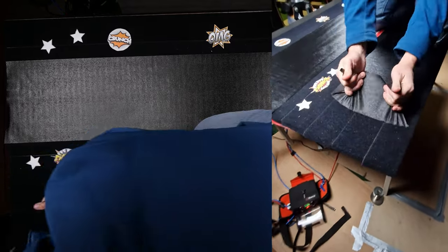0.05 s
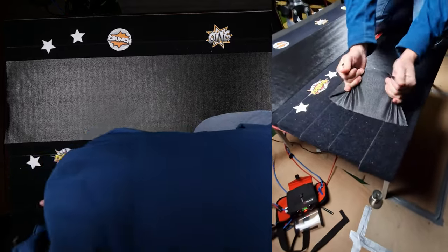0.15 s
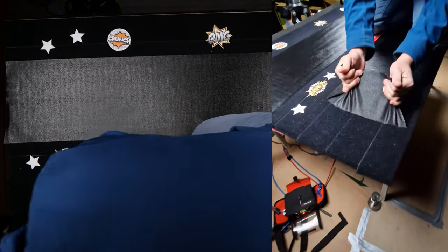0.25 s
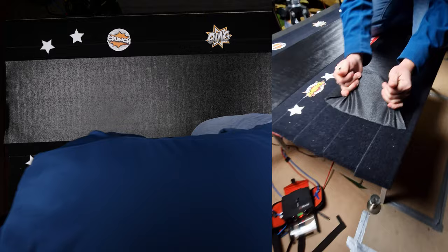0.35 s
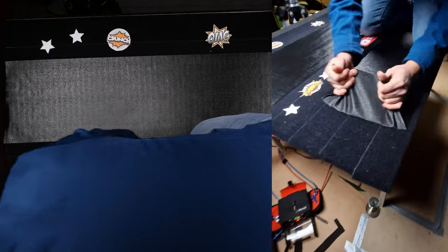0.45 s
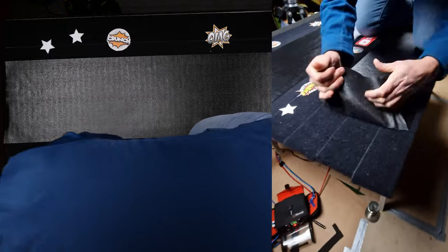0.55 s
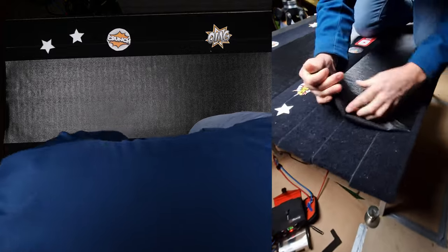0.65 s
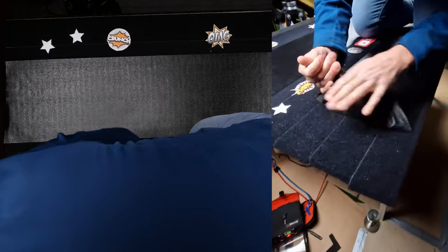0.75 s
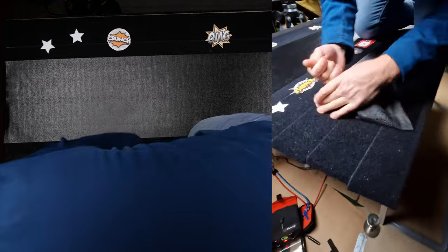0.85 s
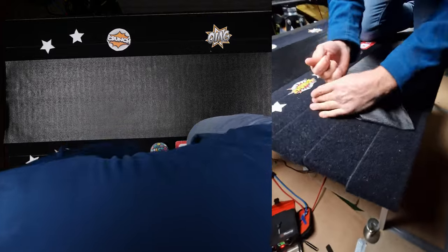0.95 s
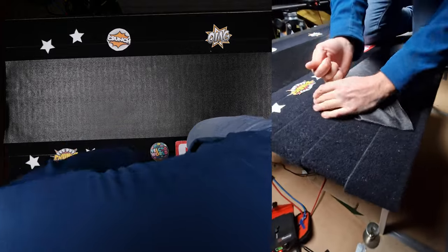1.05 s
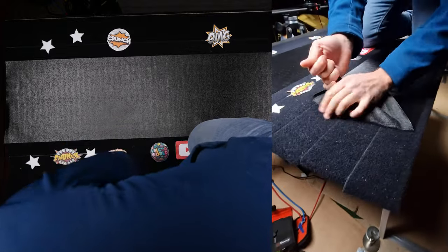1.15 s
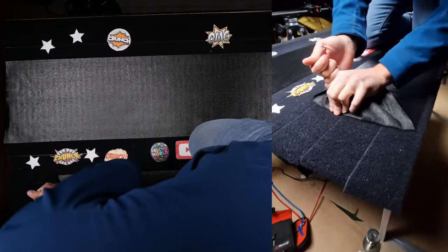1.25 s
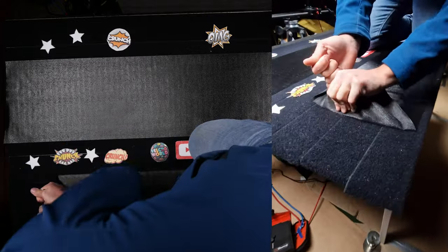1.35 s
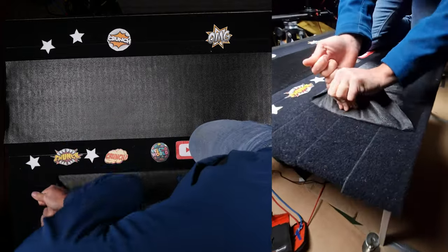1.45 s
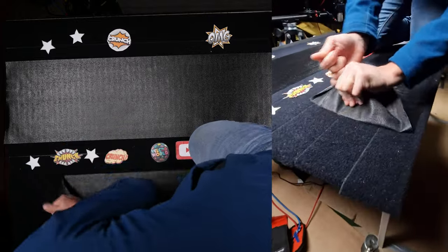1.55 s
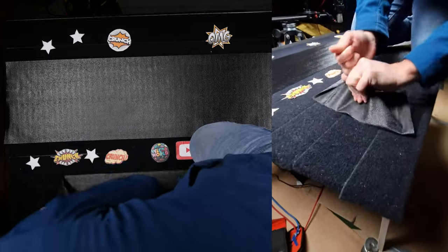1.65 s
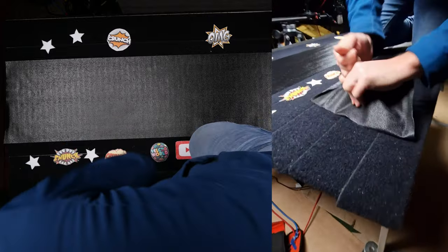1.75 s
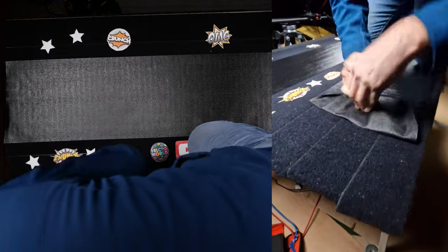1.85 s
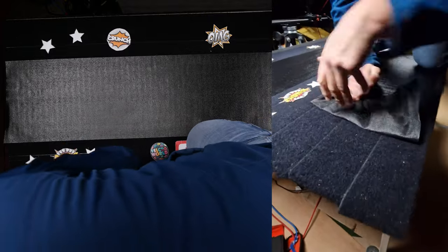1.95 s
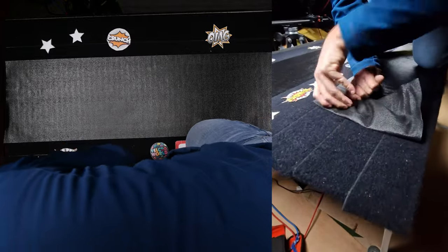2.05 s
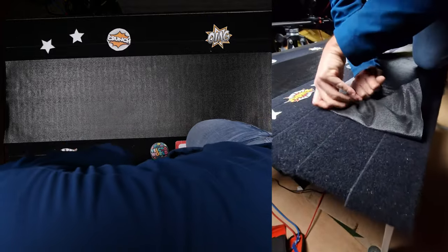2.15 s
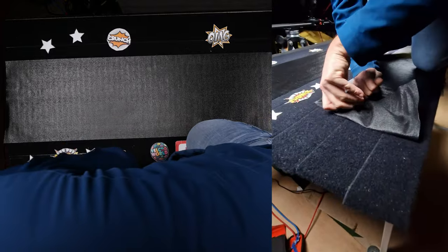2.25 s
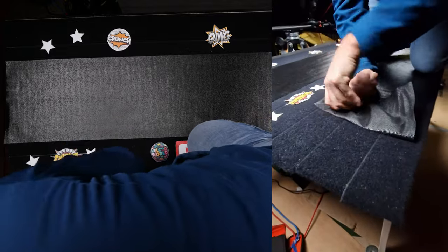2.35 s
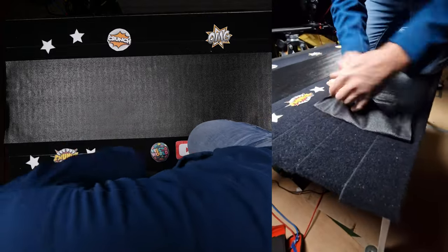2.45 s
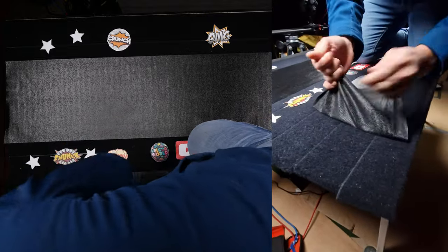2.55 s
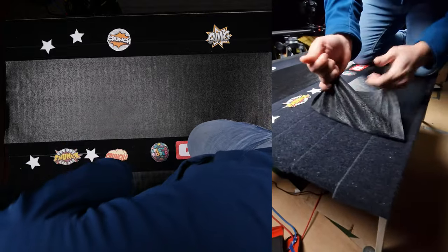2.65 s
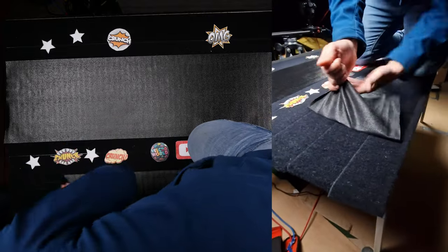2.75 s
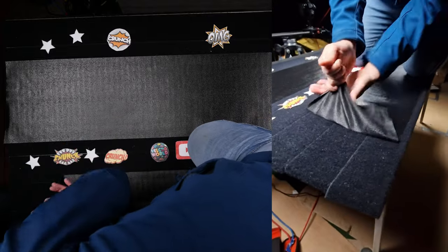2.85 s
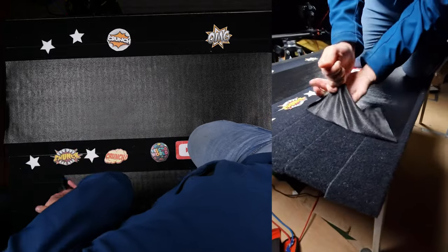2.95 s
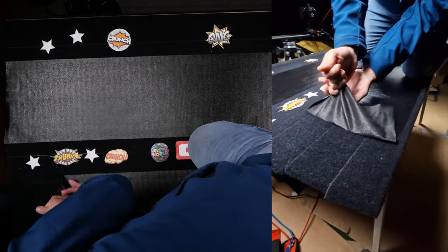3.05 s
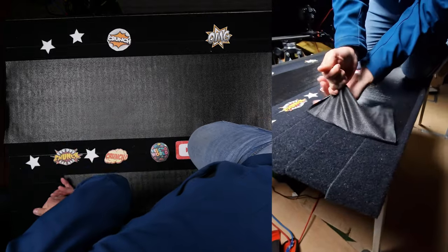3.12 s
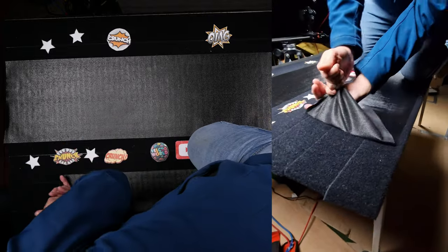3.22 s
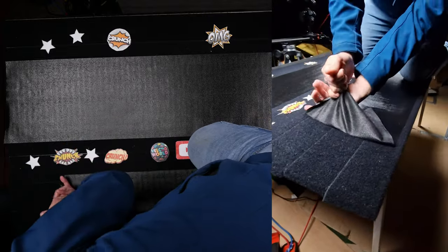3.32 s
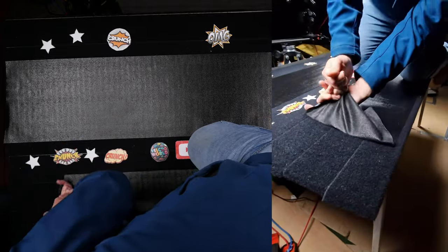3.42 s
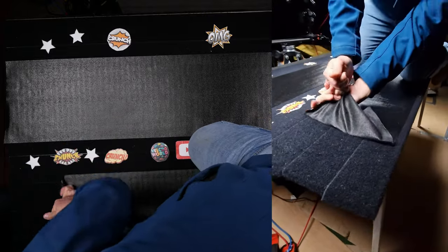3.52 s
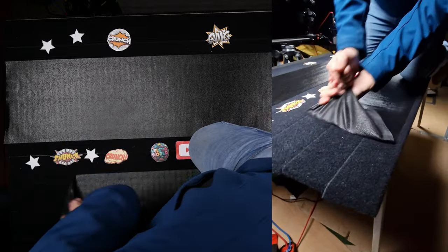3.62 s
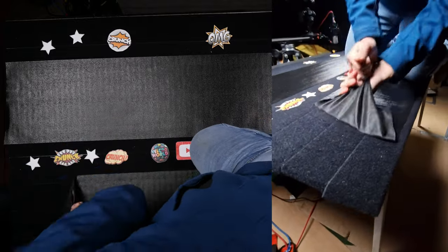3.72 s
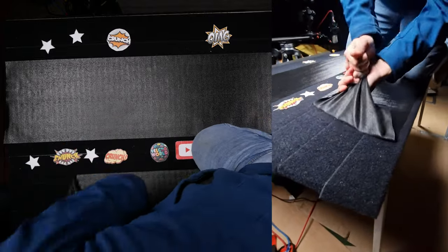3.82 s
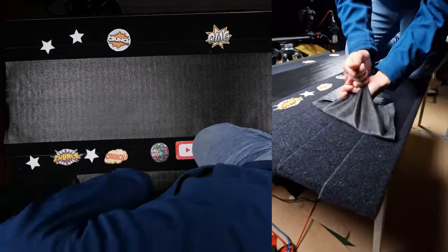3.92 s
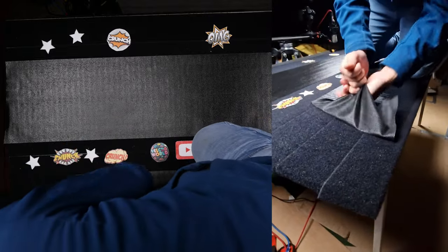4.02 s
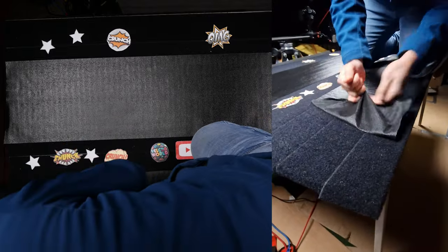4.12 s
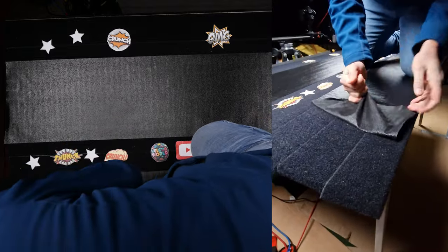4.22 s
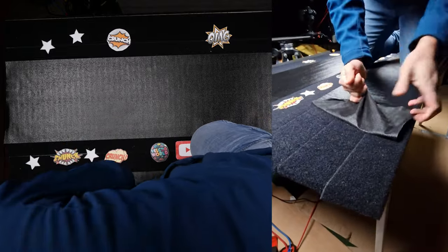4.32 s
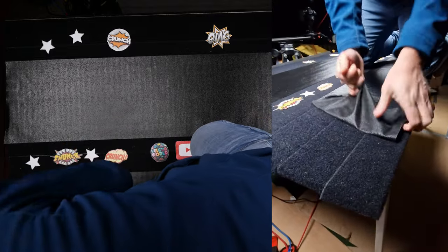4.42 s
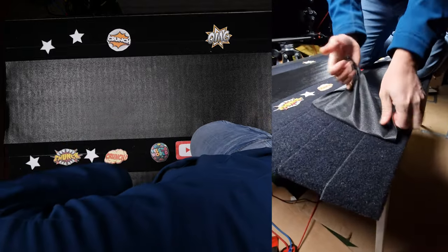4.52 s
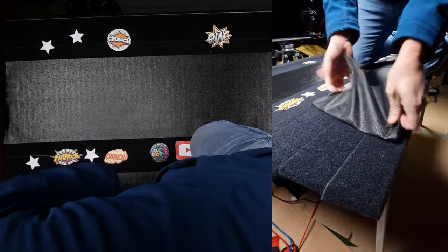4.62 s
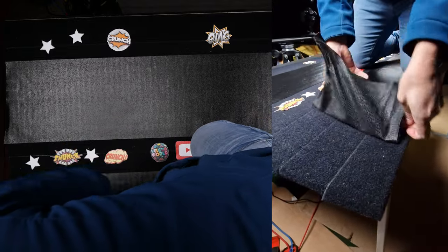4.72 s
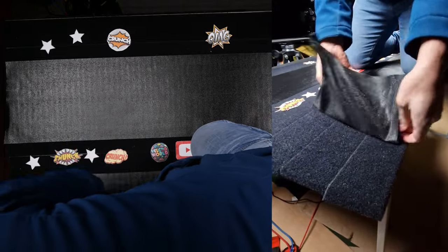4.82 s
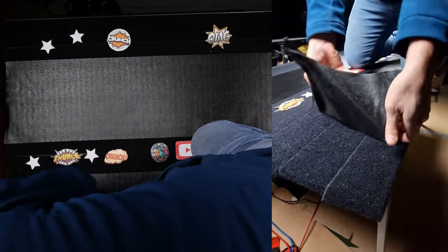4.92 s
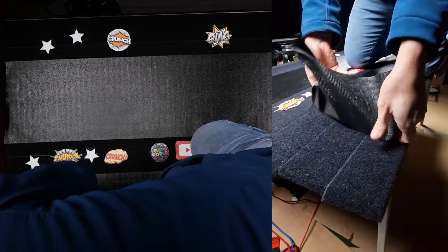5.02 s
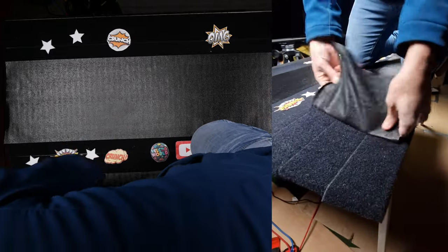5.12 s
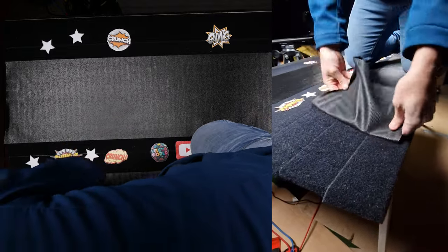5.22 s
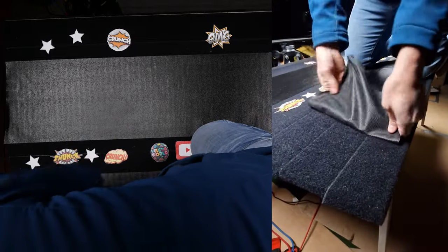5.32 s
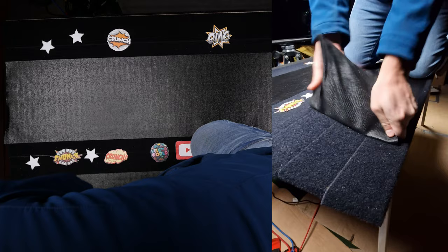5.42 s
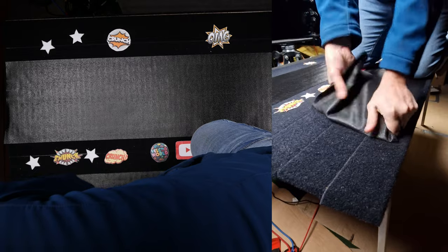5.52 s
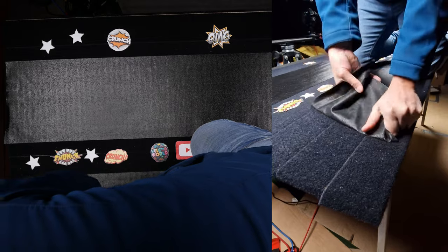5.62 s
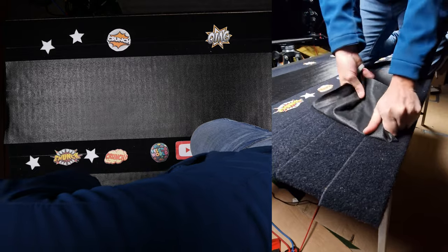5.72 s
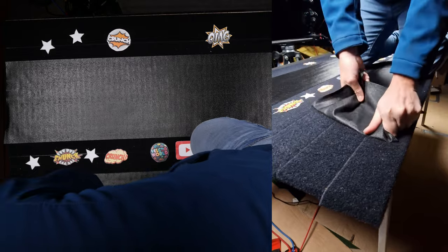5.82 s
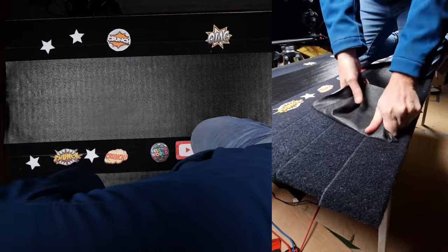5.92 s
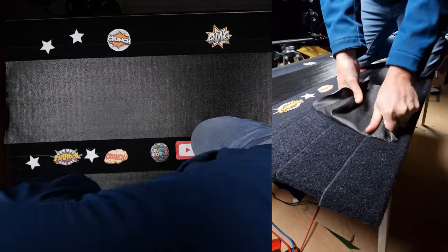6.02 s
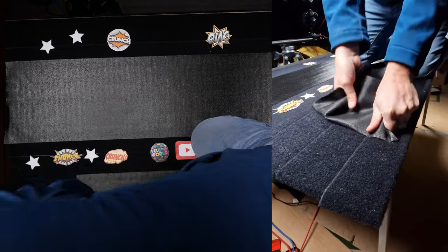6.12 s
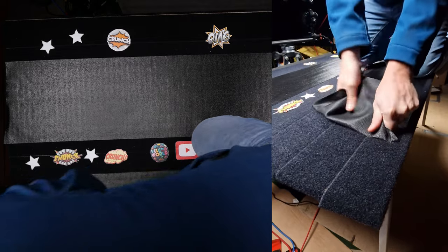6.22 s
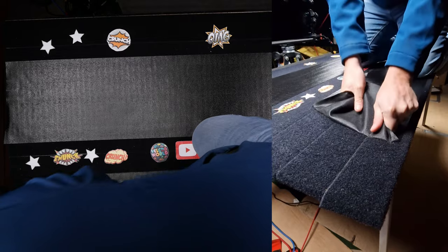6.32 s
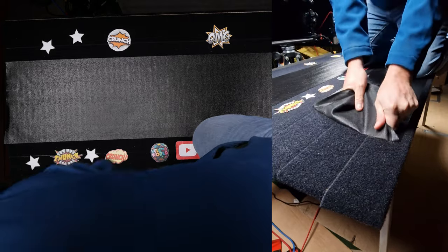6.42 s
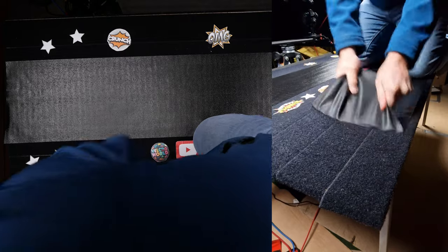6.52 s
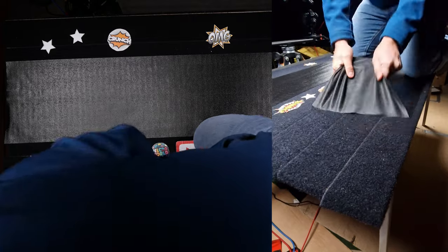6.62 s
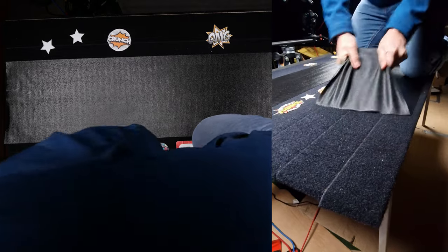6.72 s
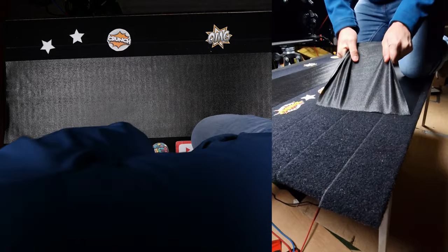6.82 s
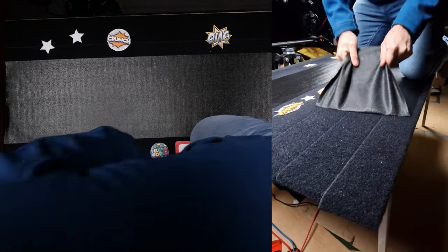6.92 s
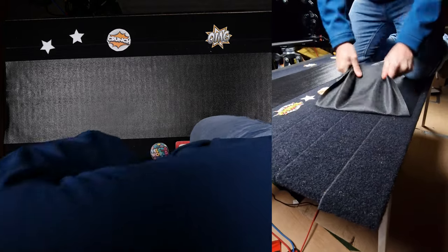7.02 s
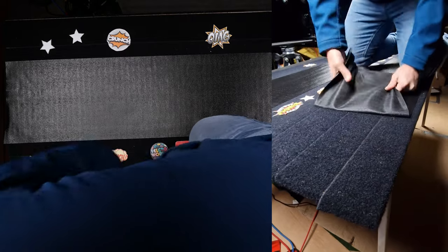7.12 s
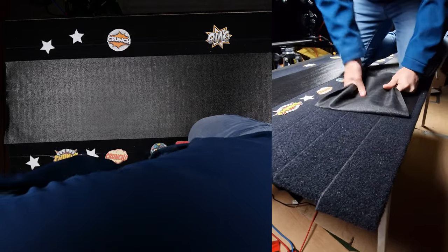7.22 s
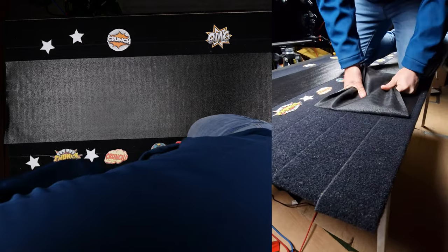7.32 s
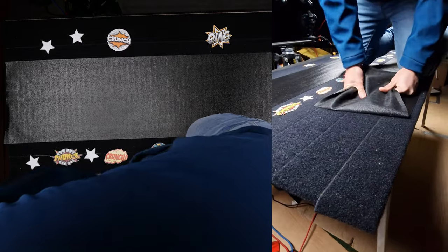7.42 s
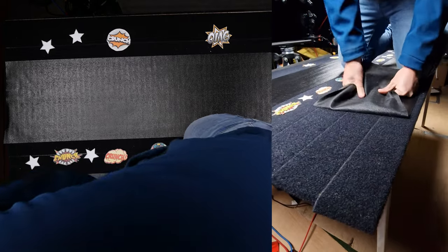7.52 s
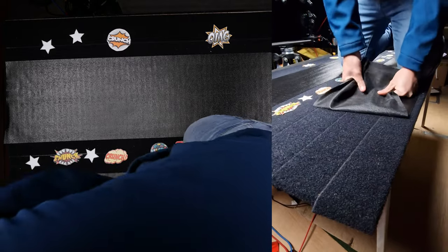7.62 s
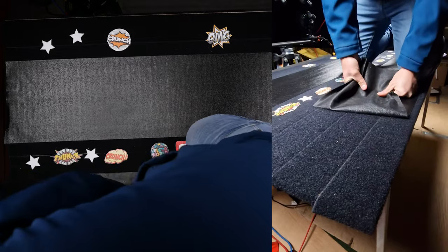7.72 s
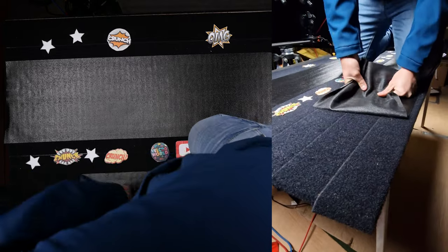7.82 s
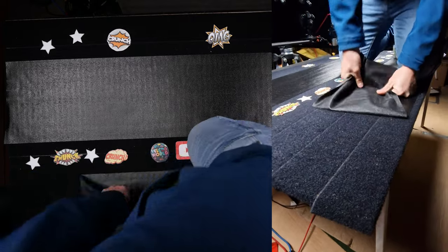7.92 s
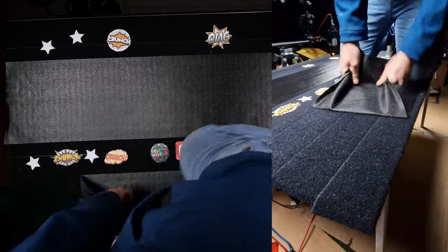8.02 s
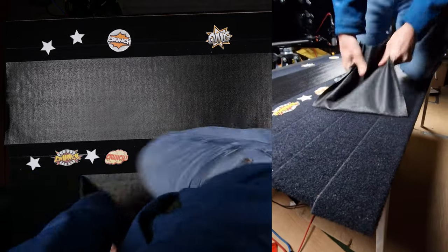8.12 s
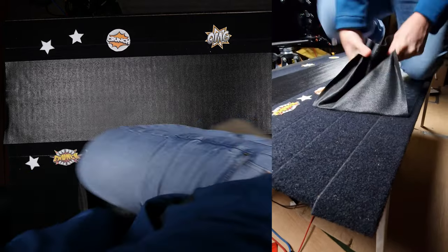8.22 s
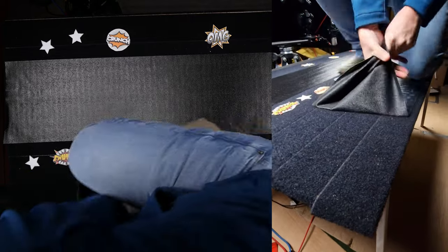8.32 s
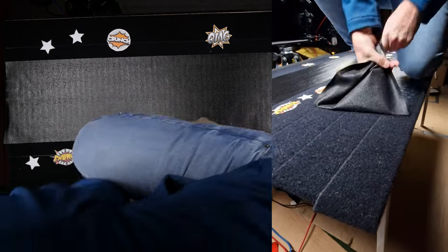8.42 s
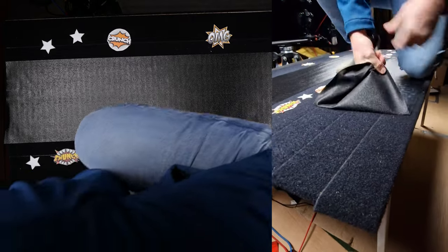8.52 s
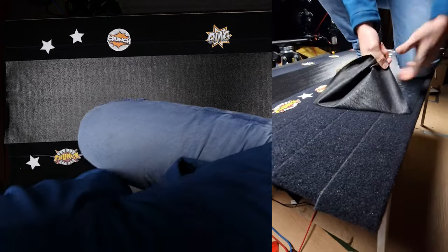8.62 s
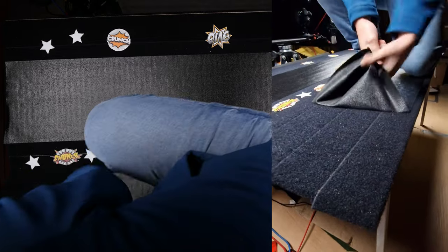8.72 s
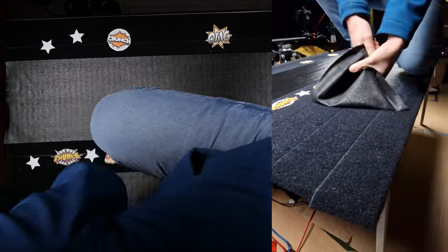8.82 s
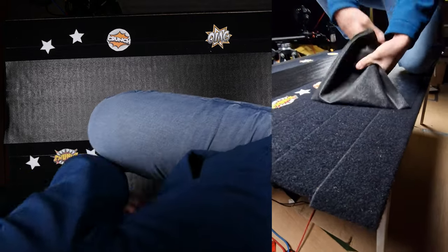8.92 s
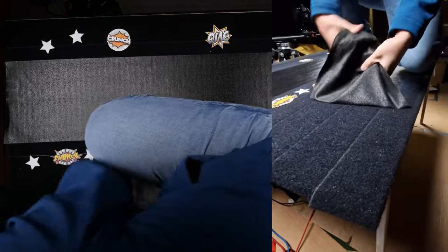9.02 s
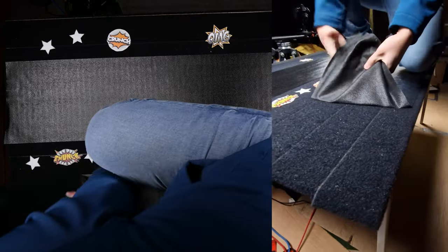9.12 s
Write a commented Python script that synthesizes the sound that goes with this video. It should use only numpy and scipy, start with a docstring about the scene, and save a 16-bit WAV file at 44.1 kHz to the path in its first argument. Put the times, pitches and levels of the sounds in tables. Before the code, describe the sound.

Close, dry rips of hook-and-loop fastener peeling from a board, separated by sparse crackles and hands shifting the cloth.

```python
"""Ripping hook-and-loop cloth off a board

The cloth is pulled off a padded board in a small workshop, close to two spaced microphones.
Every hook that lets go is a click: sparse crackle while hands shift the cloth, a dense rip when it tears
free. The board booms under the pull, fingers knock and rub on it, and moving cloth pushes the air."""
import sys
import numpy as np
from scipy import signal
from scipy.fft import rfft, irfft
from scipy.io import wavfile

SR = 44100
rng = np.random.default_rng(int(sys.argv[2]) if len(sys.argv) > 2 else 0)


def wrap_up_sound(samples):
    """Save the sound to the file named by the first command line argument, as 16-bit audio."""
    columns = np.atleast_2d(samples).T
    # keep every value between -1 and 1, then stretch to whole-number steps
    tamed = np.clip(columns, -1, 1)
    steps = np.round(tamed * 32767).astype(np.int16)
    wavfile.write(sys.argv[1], SR, steps)


N = 403956

# The tone of the quiet workshop: (frequency [Hz], relative level [dB])
HUSH_TONE = [(24, -23), (40, 11), (96, -27), (150, -2), (407, -28), (722, -7), (1520, 4), (2710, 0),
             (15500, -17)]
# How much later the right microphone hears the action: (time [s], delay [samples])
RIGHT_DELAY = [(0, 15.64), (3.8, 15), (4.5, 14.1), (6.6, 13.94), (7.5, 11.7), (9.16, 13.6)]
# Cloth flapped or slapped down, pushing air: (middle [s], length [s], level [dB])
CLOTH_FLAPS = [(.25, .1, -37), (.86, 0.42, -52), (1.91, 0.14, -42), (3.8, 0.078, -30), (3.91, .08, -41),
               (5.49, 0.16, -49), (6.855, 0.051, -41), (7.25, 0.29, -42), (7.63, 0.14, -40),
               (7.89, .08, -26.5), (8.24, 0.31, -33.5), (8.45, 0.12, -29), (8.76, 0.2, -47),
               (9.04, 0.13, -39)]
# Hands rubbing over the cloth: (middle [s], half length [s], pitch [Hz], level [dB])
HAND_RUBS = [(.55, 0.071, 875, -44), (0.717, 0.047, 3700, -37), (0.869, 0.064, 805, -39.5),
             (1.141, 0.047, 1190, -43), (2.971, 0.098, 1040, -50), (3.962, 0.01, 2630, -36),
             (4.113, 0.095, 3300, -43.5), (4.9, 0.013, 2660, -41), (8.199, 0.053, 890, -49),
             (8.296, 0.05, 1750, -27), (8.898, 0.037, 3470, -29.5)]
# Fingers and knuckles on the board: (time [s], strength [dB], extra bass [dB])
FINGER_KNOCKS = [(0.013, -16, -61), (0.053, -19.5, -39), (0.626, -27.5, -8), (0.654, -19.5, -28),
                 (0.82, -27.5, 14), (1.208, -31, -29), (1.291, -25.5, -22), (1.487, -22.5, 0),
                 (1.849, -34.5, -46), (1.89, -43, -25), (2.509, -15.5, 12.5), (2.841, -27, -23),
                 (4.993, -36, -16), (5.136, -26.5, -16), (5.305, -37, -21), (5.376, -34, -3),
                 (5.397, -33.5, -1), (5.438, -31, -1.5), (5.454, -17.5, -5), (5.585, -24, 6),
                 (5.986, -21.5, -17), (6.234, -15.5, -40), (6.438, -14, -21), (7.211, -23, -9),
                 (7.541, -32, -17), (7.641, -24, 5), (3.786, -31.5, 5), (7.854, -10.5, 10),
                 (7.995, -30.5, 13), (8.108, -29, -16), (8.38, -27, -19), (8.406, -22, -14)]
# The notes of the knocked board: (frequency [Hz], relative level [dB], time to fade by 60 dB [s])
BOARD_NOTES = [(89.7, -32, 0.017), (143.4, -23, 0.26), (219, 6.5, 0.0065), (592, 9.5, 0.0068),
               (828, 9, 0.0064), (1160, 1, 0.0064), (1820, -1.5, 0.0086)]
# Ringing of the board and the space under the cloth: (frequency [Hz], width [Hz], gain [dB])
RESONANCES = [(143.8, 6, 3.5), (224, 130, -19), (769, 76, -5), (1280, 72, 0), (2960, 610, -20)]
# A click has three parts: the hook, the body (taut cloth and padding) and the board.
# The tone of each: (frequency [Hz], relative level [dB])
HOOK_TONE = [(900, -11.5), (1400, 2.5), (2200, 2), (3200, 0.5), (4500, 2), (6500, -1.5), (10000, -2.5),
             (15000, -11.5)]
BODY_TONE = [(250, -21.5), (400, -3.5), (600, 2), (900, 1), (1300, -6), (2000, -5), (3000, -17.5)]
BOARD_TONE = [(60, 4), (100, 0.5), (150, 1), (230, 5), (340, -7.5), (500, -16)]
# How bright the pull sounds: (time [s], relative treble [dB])
PULL_TREBLE = [(0, -5), (.6, -5.5), (1.1, -5.5), (1.6, -4.5), (2, -9.5), (2.7, -6.5), (3.3, -7.5),
               (3.7, -3), (4.2, -7), (4.8, -6), (5.3, -6.5), (5.8, -7), (6.6, -4.5), (7.2, -8), (7.7, -8),
               (8.3, -6.5), (9.16, -7.5)]
# Hands shift, press and slowly peel the cloth:
# (middle [s], length [s], level [dB], relative body [dB], relative board [dB])
CLOTH_RUSTLES = [(0.027, 0.054, -42.5, 1, 18), (0.086, 0.092, -32, -4.5, -35),
                 (0.22, 0.026, -42.5, -6.5, -15), (.42, 0.11, -51.5, -58, -43), (0.483, 0.26, -48, -3, 0),
                 (.72, 0.081, -41, 1.5, -1.5), (0.861, 0.089, -50, 6, 4.5), (1.037, 0.09, -62.5, 2, -2),
                 (1.134, 0.096, -52.5, 5.5, 0), (1.31, 0.039, -54, 5, -17), (1.467, 0.36, -54, -1, -10),
                 (1.844, 0.084, -44, -1, -2.5), (1.984, 0.095, -48, -18, -12),
                 (2.215, 0.087, -46, -9.5, -51), (2.39, 0.15, -50, -6.5, -4.5), (2.517, 0.16, -56.5, 3, 3),
                 (2.824, 0.11, -53, -6, -10), (2.977, 0.16, -57, 3.5, -2.5),
                 (3.216, 0.14, -51.5, -3.5, -4.5), (3.367, 0.022, -60, -18, -39),
                 (3.868, 0.36, -57.5, -2, 7), (4.003, 0.17, -51.5, -11, -22),
                 (4.129, 0.11, -39, -10.5, -16), (4.258, 0.18, -58, -20, -39),
                 (4.515, 0.1, -39.5, -17, -16.5), (4.664, 0.14, -47, -9.5, -4.5),
                 (4.882, 0.058, -51.5, -0.5, -9), (5.098, 0.068, -56, 1, -7), (5.18, 0.062, -51, -0.5, -8),
                 (5.339, 0.038, -53, -4, -3), (5.491, 0.13, -51, 7, 7), (5.613, 0.11, -52, -6, -9),
                 (5.716, 0.063, -51, -2, -12), (5.883, 0.074, -52, -2, -2),
                 (5.975, 0.085, -34.5, -9.5, -20.5), (6.14, 0.21, -45.5, -3, -8),
                 (6.271, 0.061, -38, -6, -27), (6.382, 0.077, -40, -9, -36), (6.8, 0.18, -38, -13, -12),
                 (7.03, 0.14, -35, -16, -27), (7.18, 0.48, -48.5, -3.5, -2.5), (7.56, .16, -42, -8.5, -20),
                 (7.637, 0.12, -44, -4.5, 1), (7.862, 0.056, -52, 8, 38), (7.98, 0.16, -45.5, -16, -19),
                 (8.134, 0.48, -42.5, -7, -5), (8.297, 0.083, -41.5, 0, -0.5), (8.48, 0.38, -42, -5, -11.5),
                 (8.758, 0.12, -33, -12, -13), (8.9, 0.12, -34.5, -10, -5),
                 (9.064, 0.11, -35.5, -8.5, -9.5)]
# Hard tears: (start [s], length [s], level [dB], drop during the tear [dB], relative body [dB],
# relative board [dB], rise of the creep that leads up to it [dB/s])
HARD_TEARS = [(0.108, 0.038, -16.5, 3, -1, -2.5, 446), (1.54, 0.077, -22, -1.5, 0.5, -8, 392.5),
              (3.625, 0.072, -14.5, 2.5, -6.5, -8.5, 750.5), (6.441, 0.301, -15.5, 1.5, -1.5, -6, 446)]
# The loudest bunches of hooks that snap together: (time [s], strength [dB], relative treble [dB])
HOOK_SNAPS = [(0.0274, -24, -13.5), (0.0538, -29, -5), (0.4033, -31.5, -0.5), (0.4504, -26, -7.5),
              (0.4654, -21, -8), (0.51, -22.5, 1), (0.5515, -24.5, -1), (0.6549, -13.5, -11),
              (0.6932, -16, -5), (1.0332, -30, -9), (1.13, -26.5, -7), (1.2076, -16.5, -6.5),
              (1.291, -19, -9), (1.3354, -32, -2.5), (1.4173, -25.5, -5), (1.45, -20.5, -5.5),
              (1.4797, -20.5, -6), (1.4942, -17.5, -8), (1.5509, -4.5, -6.5), (1.5688, -9.5, -2.5),
              (1.6124, -15.5, -8), (1.7461, -20.5, -11.5), (1.8134, -24, -10), (1.8292, -14.5, -6),
              (1.8901, -8.5, -35), (1.95, -26.5, -3), (1.9792, -32, -14), (2.0944, -28, -16.5),
              (2.169, -20.5, -21.5), (2.2335, -14.5, -11), (2.3937, -25.5, -8), (2.439, -24, -6),
              (2.491, -27.5, -6), (2.8217, -22, -13.5), (2.8672, -24.5, -22.5), (3.3621, -27, -19.5),
              (3.478, -32.5, -12), (3.5696, -42, -4), (3.5858, -21.5, 2.5), (3.6126, -12, -4.5),
              (3.6292, -7, -11), (3.7863, -24.5, -16), (3.8741, -22.5, -11), (3.897, -23.5, -8.5),
              (3.955, -21, -6.5), (3.9745, -22.5, -8.5), (3.994, -17, -8.5), (4.249, -27.5, 1),
              (4.2682, -29.5, -1.5), (4.3031, -27, -6.5), (4.3842, -23.5, -12.5), (4.4357, -20, -2.5),
              (4.5142, -20, -3), (4.558, -24, -4), (4.586, -23.5, -1), (4.6528, -19.5, -1.5),
              (4.6725, -21, -5.5), (4.7054, -19.5, -5), (4.7336, -18.5, -8), (4.8249, -29.5, -8.5),
              (4.9928, -25.5, -14.5), (5.1361, -15, -7.5), (5.1537, -30, -3.5), (5.1856, -32, 0.5),
              (5.3124, -29.5, -10), (5.463, -17.5, -11.5), (5.4989, -14.5, -10), (5.5462, -24.5, -5),
              (5.552, -22, -2.5), (5.6134, -19.5, -8), (5.6343, -26, -3.5), (5.7163, -29, -0.5),
              (5.7288, -24.5, -8), (5.887, -14.5, -18), (5.9234, -18, -16), (5.9313, -19, -12),
              (5.9522, -13, -17.5), (5.9863, -12.5, -6), (6.0195, -24, -6), (6.126, -19, -6.5),
              (6.2575, -22, -3), (6.3533, -36, 0), (6.3977, -14.5, -10.5), (6.4378, -1, -13.5),
              (6.817, -14.5, -3.5), (6.8754, -40, -0.5), (7.002, -19.5, 1), (7.0269, -18.5, -3),
              (7.0846, -12, -7.5), (7.2843, -26, -9), (7.3155, -15, -13.5), (7.4719, -19.5, -25.5),
              (7.5002, -15.5, -10.5), (7.5423, -20, -20), (7.5978, -15, -9.5), (7.6395, -17.5, -11.5),
              (7.668, -14.5, -13.5), (7.7747, -22.5, -15.5), (7.8027, -12.5, -14), (7.8977, -6.5, -17),
              (7.9336, -14.5, -11), (8.025, -25.5, -6), (8.1092, -22, 2), (8.1484, -13.5, -17.5),
              (8.381, -20, -28), (8.4014, -11.5, -7.5), (8.4962, -12, -9.5), (8.5406, -12.5, -18.5),
              (8.609, -14.5, -5), (8.6475, -17.5, -4.5), (8.6976, -9, -4), (8.7524, -16, -3),
              (8.7853, -26, 1), (8.8379, -13, -8), (8.854, -14, -7.5), (8.9089, -3.5, -12),
              (8.976, -13.5, -12.5), (9.0299, -19, -16), (9.0508, -11, -18.5), (9.1012, -14, -5)]


def from_db(db):
    """Turn decibels into a number to multiply by."""
    return 10 ** (np.asarray(db) / 20)


def rms_one(x):
    """Scale a signal so that its average power is 1."""
    return x / np.sqrt(np.mean(x ** 2) + 1e-20)


def in_time(points):
    """Join (time, value) points with straight lines, giving one value per sample."""
    return np.interp(np.arange(N) / SR, *np.transpose(points))


def at_hz(points, hz):
    """Look up the level of a tone table at a frequency, moving evenly in octaves."""
    frequencies, levels = np.transpose(points)
    return np.interp(np.log(hz), np.log(frequencies), levels)


def filtered(x, order, hz, kind):
    """Keep the "low", "high" or "band" part of a sound; a higher order cuts more steeply."""
    return signal.sosfilt(signal.butter(order, hz, kind, fs=SR, output="sos"), x)


def drift(rate_hz):
    """A smooth random wobble, about 1 in size."""
    step, warm_up = 20, 2000   # one draw every 20 samples
    r = np.exp(-2 * np.pi * step * rate_hz / SR)
    noise = rng.standard_normal(N // step + warm_up + 2)
    slow = signal.lfilter([1], [1, -2 * r, r * r], noise)[warm_up:]
    return np.interp(np.arange(N) / step, np.arange(len(slow)), rms_one(slow))


def swell(middle, length, db, edge_db=7):
    """The level in dB of a movement that grows and fades, edge_db weaker at its start and end."""
    return db - edge_db * (2 * (np.arange(N) / SR - middle) / length) ** 2


def workshop_hush(level_db):
    """The steady, quiet noise of the workshop."""
    hz = np.maximum(np.arange(N // 2 + 1) * SR / N, 1)
    spectrum = rfft(rng.standard_normal((2, N))) * from_db(at_hz(HUSH_TONE, hz))
    return from_db(level_db) * rms_one(irfft(spectrum, N))


def room_echo(x, level_db, fade_s, cutoff_hz):
    """Many reflections die away, duller than the direct sound and different on each side."""
    t = np.arange(SR // 2) / SR
    tail = rng.standard_normal((2, len(t))) * from_db(-60 * t / fade_s) * (t > .0015)
    tail = filtered(tail, 1, cutoff_hz, "low")
    tail /= np.sqrt(np.sum(tail ** 2, axis=1, keepdims=True))
    return from_db(level_db) * signal.fftconvolve(x, tail, axes=1)[:, :N]


def air_push(still_db, tear_db, stereo_spread):
    """Moving cloth and hands swing the air: a very deep rumble, nearly alike on both sides."""
    # The loose cloth flies up as each tear ends.
    flicks = [(s + length - .012, .1 + length / 2, tear_db) for s, length, *_ in HARD_TEARS]
    pushes = sum(from_db(np.maximum(swell(*row), -150)) for row in CLOTH_FLAPS + flicks)
    shared, apart = filtered(rng.standard_normal((2, N + SR)), 3, [24, 44], "band")[:, SR:]
    return (from_db(still_db) + pushes) * rms_one(shared + stereo_spread * apart * [[1], [-1]])


def hand_rubs(sharpness):
    """Skin drags over the fuzzy cloth: smooth noise rings in the hollow of the cupped hand."""
    out, delay = np.zeros((2, N)), in_time(RIGHT_DELAY)
    spread = 1 + .5 / sharpness
    for s, half_length, hz, db in HAND_RUBS:
        noise = rng.standard_normal(SR // 2)
        for _ in range(2):
            noise = filtered(noise, 1, [hz / spread, hz * spread], "band")
        size = round(2 * half_length * SR)
        stroke = from_db(db) * rms_one(noise)[:size] * np.hanning(size)
        start = round((s - half_length) * SR)
        for side, i in enumerate([start, start + round(delay[start])]):
            out[side, i:i + size] += stroke
    return out


def finger_knocks(level_db, bass_db, bass_below_hz, contact_s):
    """A knock rings the notes of the board; flat, heavy knocks favour the low ones."""
    out, delay = np.zeros((2, N)), in_time(RIGHT_DELAY)
    t = np.arange(SR // 2) / SR
    soft_landing = 1 - np.exp(-t / contact_s)
    for s, strength_db, extra_bass_db in FINGER_KNOCKS:
        ring = 0
        for hz, db, fade_s in BOARD_NOTES:
            note_db = db + rng.normal(0, 2) + (hz < bass_below_hz) * (extra_bass_db + bass_db)
            ring += from_db(note_db - 60 * t / fade_s) * np.sin(2 * np.pi * hz * t)
        knock = from_db(strength_db + level_db) * ring * soft_landing
        start = round(s * SR)
        for side, i in enumerate([start, round(s * SR + delay[start])]):
            out[side, i:i + len(t)] += knock[:N - i]
    return filtered(out, 2, 70, "high")   # cut the deep thump below 70 Hz from each knock's start


def hollow_ring(x):
    """The board's low ring and the space under the lifted cloth colour every click."""
    out = x.copy()
    for hz, width_hz, db in RESONANCES:
        r = np.exp(-np.pi * width_hz / SR)
        feed = (1 - r * r) / 2 * np.array([1, 0, -1])
        feedback = [1, -2 * r * np.cos(2 * np.pi * hz / SR), r * r]
        out += from_db(db) * signal.lfilter(feed, feedback, x)
    return out


def tear(start, length, db, drop_db, body_db, board_db, creep_db_per_s):
    """Hooks creep, rip and let go: the level, body and board of one tear over time, in dB."""
    t = np.arange(N) / SR
    before, after_s = t < start, np.maximum(t - start - length, 0)
    done = np.clip((t - start) / length, 0, 1)
    creep_db = db - 8 - creep_db_per_s * (start - t)
    bite_db = -6 * np.maximum(1 - done / .15, 0)   # full force comes 15% of the way in
    let_go_db = np.maximum(-742 * after_s, -20.5 - 169 * after_s)   # last hooks go, then cloth settles
    level_db = np.where(before, creep_db, db + bite_db - drop_db * done + let_go_db)
    thin_db = -10 * before   # the creep has little body or board
    left_s = length * (1 - done)   # both grow as more cloth comes free
    return level_db, body_db + thin_db - 16 * left_s, board_db + thin_db - 39.5 * left_s


def pull_on_cloth(rest_db, rest_body_db, rest_board_db):
    """Level, body, board and treble of the pull in dB; the strongest movement sets body and board."""
    moves = [(np.full(N, rest_db), rest_body_db, rest_board_db)]   # the cloth is never quite still
    moves += [(swell(s, length, db), body, board) for s, length, db, body, board in CLOTH_RUSTLES]
    moves += [tear(*row) for row in HARD_TEARS]
    power, body, board = 0, 0, 0
    for level_db, body_db, board_db in moves:
        weight = from_db(np.maximum(level_db, -150)) ** 2
        power += weight
        body += weight * body_db
        board += weight * board_db
    treble_db = in_time(PULL_TREBLE) + drift(10)
    return 10 * np.log10(power), body / power, board / power, treble_db


def peeling_hooks(pull, per_s, level_db, size_db, clump_db, clump_hz, slack_db):
    """Hooks let go at random, in clumps while the cloth is slack. Gives rows for hook_clicks."""
    pull_db, *tone_db = pull
    slack = np.clip((-22 - pull_db) / 14, .1, 1)   # a hard pull tears evenly
    clumps = from_db(clump_db * slack * drift(clump_hz))
    sizes = rms_one(from_db(size_db * np.minimum(rng.exponential(1, N), 3))) * rng.choice([-1, 1], N)
    sizes *= from_db(pull_db + level_db + slack_db * slack) * np.sqrt(SR / per_s)
    sizes *= from_db(.92 * (1.5 - slack) * drift(130))   # a hard pull chatters: rows hold, then give
    at = np.flatnonzero(rng.random(N) < per_s * clumps / SR)
    chance = rng.standard_normal((N, 4))
    return np.column_stack([at, sizes[at], *(curve[at] for curve in tone_db), chance[at]])


def snapping_hooks(level_db, trail_db, body_db, board_db, fade_s, count=24):
    """One hook snaps hard and its neighbours follow more weakly. Gives rows for hook_clicks."""
    s, strength_db, treble_db = np.array(HOOK_SNAPS).T[:, :, None]
    follows = np.arange(count) > 0
    lateness = rng.random((len(s), count)) / 2 * follows
    sizes = from_db(strength_db + level_db - 60 * lateness + trail_db * follows)
    sizes *= rng.choice([-1, 1], sizes.shape)
    stretch = 2 ** (treble_db / 15)   # a snap 15 dB duller lasts half as long
    at = np.minimum((s + lateness * fade_s * stretch) * SR, N - 1)
    chance = .88 * rng.standard_normal((at.size, 4))
    columns = np.broadcast_arrays(at, sizes, body_db, board_db, treble_db)
    return np.column_stack([column.ravel() for column in columns] + [chance])


def click_pair(at, sizes, delay):
    """Place clicks on two channels, the right one later by delay samples."""
    out = np.full((2, N + 64), 1e-18)
    np.add.at(out[0], at, sizes)
    np.add.at(out[1], at + np.round(delay).astype(int), sizes)
    return out[:, :N]


def hook_clicks(releases, spread_samples, colour_db, hook_gain_db, body_gain_db, board_gain_db):
    """Each hook that lets go clicks with its own tone, from its own spot on the peeling edge."""
    at, sizes, body_db, board_db, treble_db, spot, *colours = releases.T
    at = at.astype(int)
    delay = np.clip(in_time(RIGHT_DELAY)[at] + spread_samples * spot, 0, 60)
    edges_hz = 60 * 2 ** np.arange(0, 8.6, .5)   # bands half an octave wide
    out = np.zeros((2, N))
    for k, (low, high) in enumerate(zip(edges_hz, edges_hz[1:])):
        hz = np.sqrt(low * high)
        tilt_db = (treble_db + 6.5) * np.clip(np.log2(hz / 3500), 0, 2)   # dull or bright clicks
        hook = from_db(hook_gain_db + at_hz([(400, -70)] + HOOK_TONE, hz) + tilt_db)
        body = from_db(body_gain_db + at_hz([(100, -57.5)] + BODY_TONE + [(6000, -50.5)], hz) + body_db)
        board = from_db(board_gain_db + at_hz(BOARD_TONE + [(1000, -78)], hz) + board_db)
        fold_db = 1.8 * drift(17.8)[at]   # shifting folds colour each band for a moment
        colour = from_db(colour_db * colours[k % 3] + fold_db)
        clicks = click_pair(at, sizes * (hook + body + board) * colour, delay)
        out += (-1) ** k * filtered(clicks, 2, [low, high], "band")
    return out


def scene():
    """Mix the hooks, hands, room, moving air and hush."""
    pull = pull_on_cloth(rest_db=-64, rest_body_db=-11.5, rest_board_db=-9.5)
    # Many hooks combing through loops swish; single stubborn hooks crackle.
    swish = peeling_hooks(pull, per_s=9000, level_db=-4.5, size_db=3,
                          clump_db=3.5, clump_hz=71.5, slack_db=-1.5)
    crackle = peeling_hooks(pull, per_s=300, level_db=-11.5, size_db=7.5,
                            clump_db=6.5, clump_hz=17, slack_db=4)
    snaps = snapping_hooks(level_db=-.44, trail_db=-1.5, body_db=-15.5, board_db=-20.5, fade_s=.022)
    clicks = hook_clicks(np.vstack([swish, crackle, snaps]), spread_samples=2.3, colour_db=3,
                         hook_gain_db=5.5, body_gain_db=16, board_gain_db=19.5)
    near = hollow_ring(clicks) + hand_rubs(sharpness=2.2)
    near += finger_knocks(level_db=2.5, bass_db=-5.5, bass_below_hz=400, contact_s=.0014)
    echo = room_echo(near, level_db=-14, fade_s=.09, cutoff_hz=14000)
    air = air_push(still_db=-56, tear_db=-30, stereo_spread=.11)
    lean_left = from_db([[.4], [-.4]])
    return (near + echo) * lean_left + air + workshop_hush(level_db=-63)


def record(dry):
    """The left side gets more bass, the loudest peaks are clipped and the highest treble is cut."""
    bass = filtered(dry, 1, 250, "low")
    clipped = np.clip(dry + bass * [[.15], [-.15]], -.9, .9)
    treble_cut = signal.ellip(12, .3, 60, 15700, fs=SR, output="sos")
    return np.clip(signal.sosfilt(treble_cut, clipped), -1, 1)


dry = scene()
out = record(dry)
wrap_up_sound(out)
```